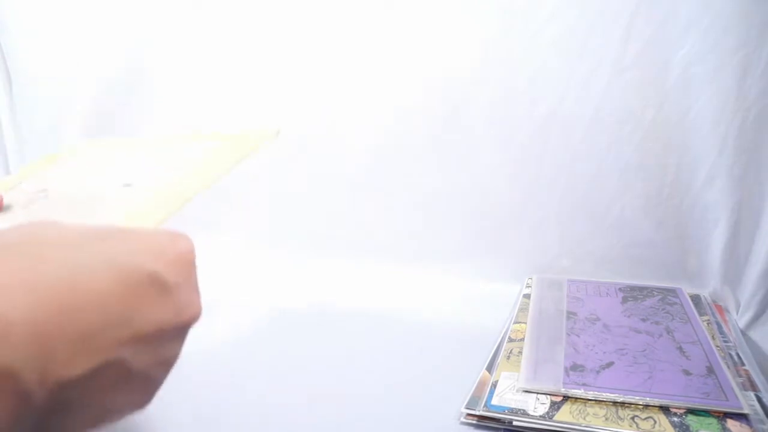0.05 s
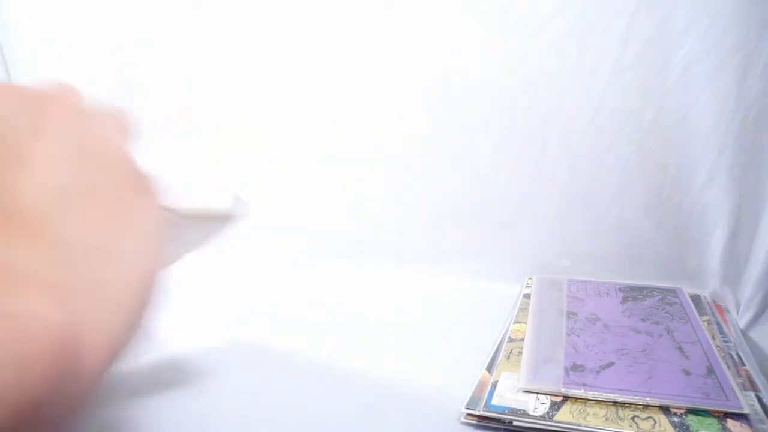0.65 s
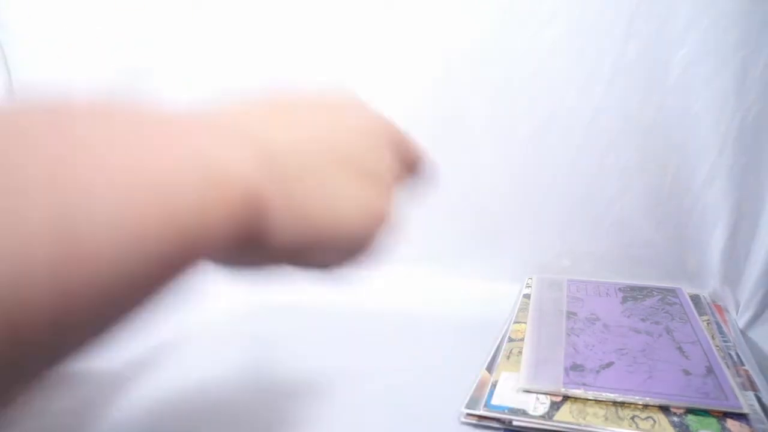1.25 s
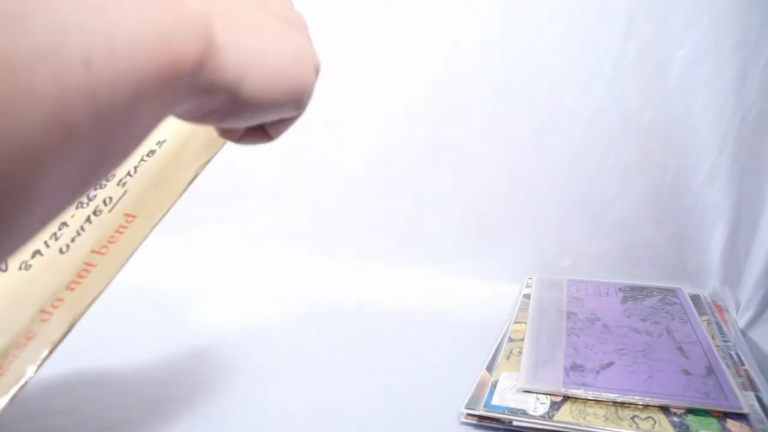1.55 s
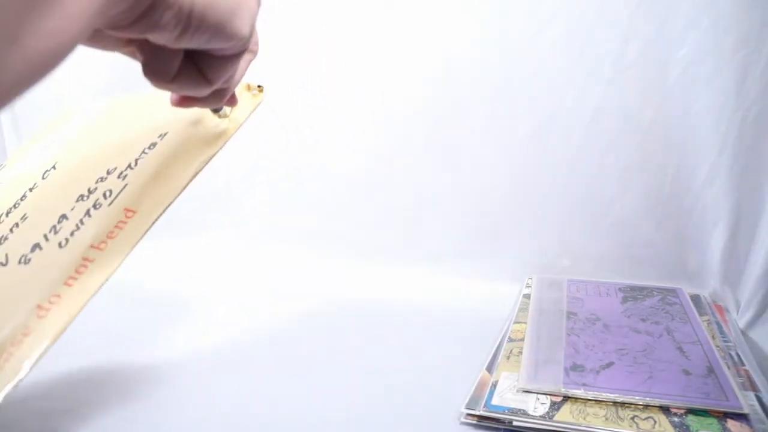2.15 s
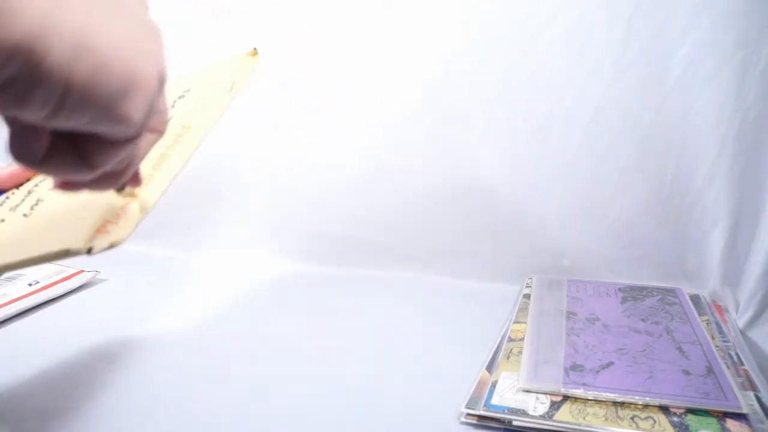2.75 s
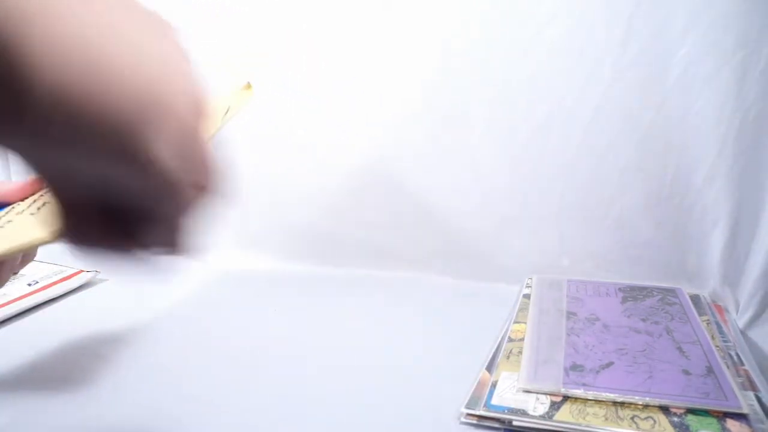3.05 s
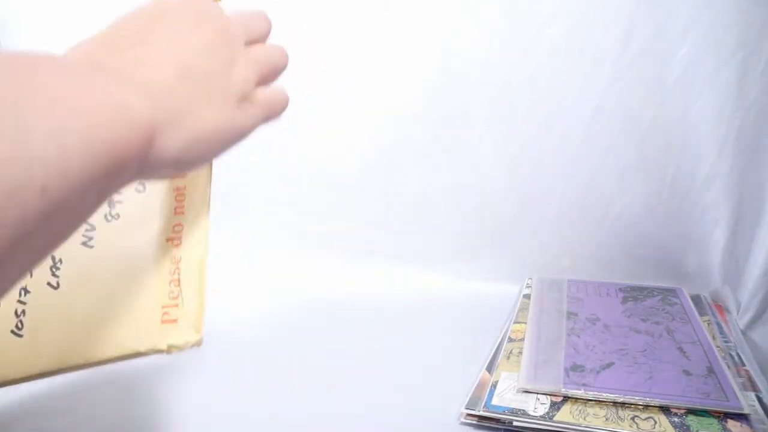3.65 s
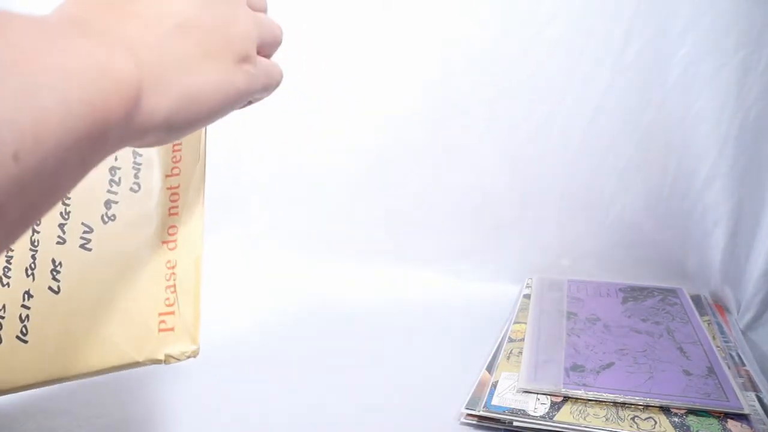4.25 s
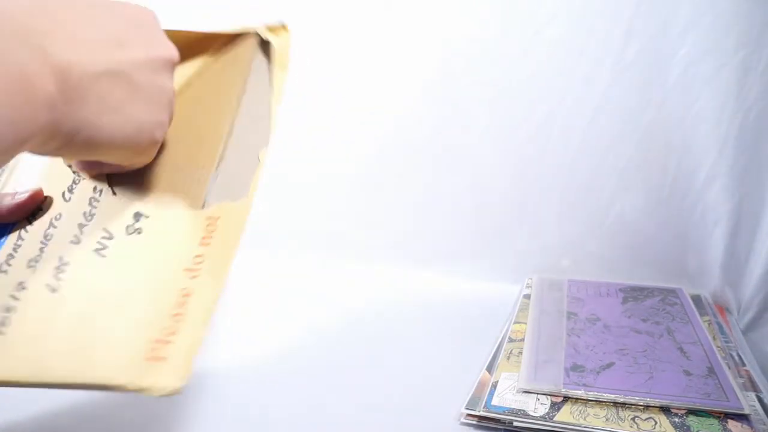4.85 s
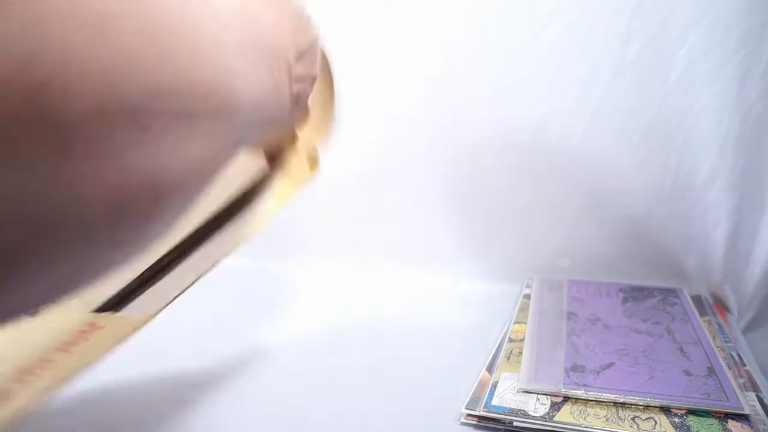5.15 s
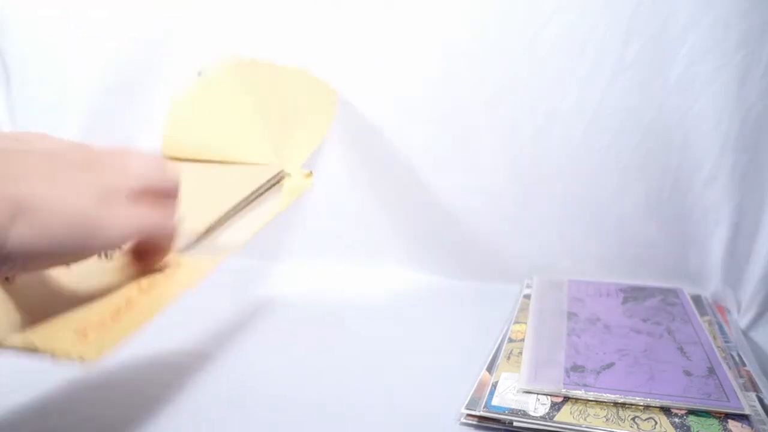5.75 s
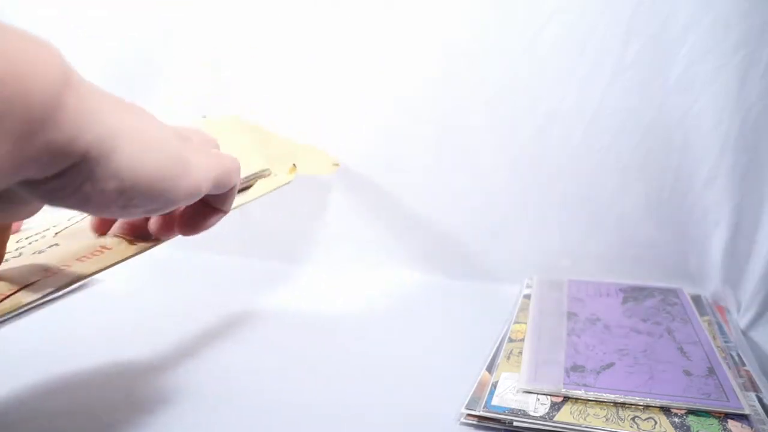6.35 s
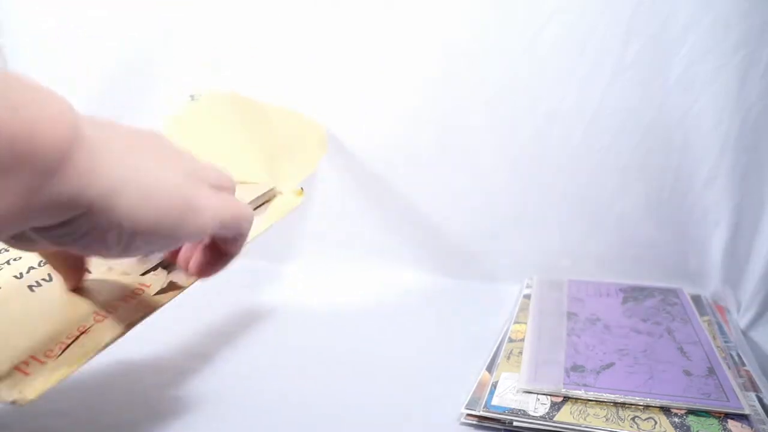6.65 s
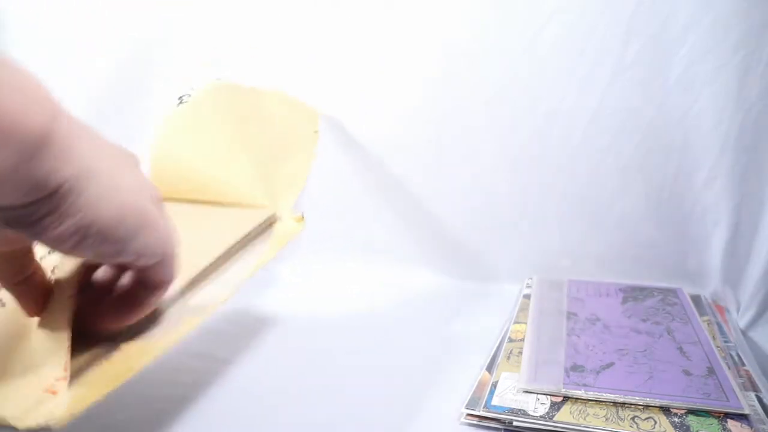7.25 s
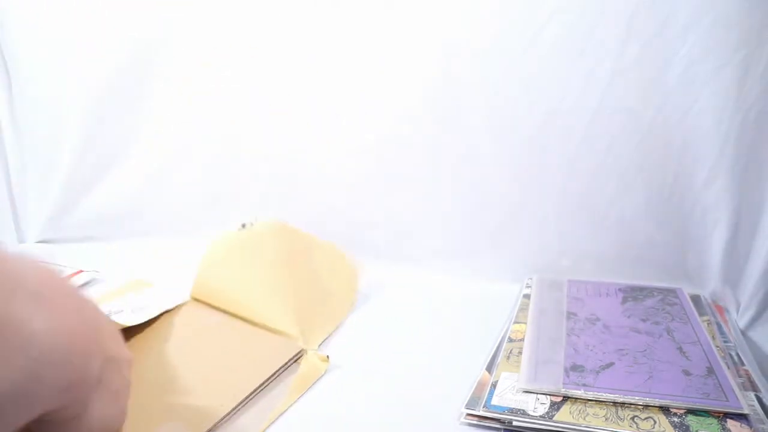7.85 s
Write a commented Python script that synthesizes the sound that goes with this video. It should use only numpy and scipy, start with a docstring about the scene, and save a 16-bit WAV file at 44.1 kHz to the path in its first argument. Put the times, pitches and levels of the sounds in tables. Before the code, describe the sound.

For the first two seconds, fingers brush over a stiff paper envelope in short, soft swishes with a few small ticks, close by in a small room with faint hiss. A crease snaps just before 2 seconds. From 2 to 3 seconds a knife slits the seal in a quick series of louder, raspy pulls. At about 3.3 seconds the knife drops on the table, bouncing with a brief metallic ring. After light rubbing, the flap is torn open from 4.3 to 5.1 seconds in several tugs, full of sharp snaps and soft hollow bumps from the flexing envelope. Quieter finger sliding follows from 5.5 seconds, with a couple of sharp pops around 6.5. From about 6.9 seconds until the end near 8, the paper is squeezed and spread open, crackling densely with loud, crisp pops.

```python
"""First you hear fingers brushing over a stiff paper mailing envelope, close by in a small room.
A knife slits the seal in several pulls, then drops on the table and rings. The flap is torn open,
and fingers slide over the paper and buckle it to reach the contents.
Rubbing, cutting and tearing are streams of tiny clicks from fibres catching and letting go.
Creases and thick fibres give louder pops, and the envelope's flat side, the panel, bumps as it flips."""
import sys
import numpy as np
from scipy import signal
from scipy.fft import rfft, irfft, next_fast_len
from scipy.io import wavfile
from scipy.ndimage import uniform_filter1d

SR = 44100
rng = np.random.default_rng(int(sys.argv[2]) if len(sys.argv) > 2 else 0)


def wrap_up_sound(samples):
    """Save the sound to the file named by the first command line argument, as 16-bit audio."""
    columns = np.atleast_2d(samples).T
    # keep every value between -1 and 1, then stretch to whole-number steps
    tamed = np.clip(columns, -1, 1)
    steps = np.round(tamed * 32767).astype(np.int16)
    wavfile.write(sys.argv[1], SR, steps)


N = 348773
TIME = np.arange(N) / SR
TOP_HZ = 11150  # the treble ends here


def amp(db):
    """Turns decibels into a number to multiply a sound by."""
    return 10 ** (np.asarray(db) / 20)


def unit(x):
    """Scales a signal to an average power of 1."""
    return x / np.sqrt(np.mean(x ** 2) + 1e-20)


def along(points, hz):
    """Reads between the rows of a (frequency, value) table, on an octave scale."""
    f, values = np.transpose(points)
    return np.interp(np.log(hz + 1), np.log(f + 1), values)


def add(track, s, sound):
    """Mixes a sound into the track, starting at s seconds."""
    rest = track[..., round(s * SR):]
    rest[..., :sound.shape[-1]] += sound[..., :rest.shape[-1]]


def lowpass(hz, edge_hz, order):
    """Gain that keeps what lies below the edge; a higher order cuts more steeply."""
    return 1 / np.sqrt(1 + (hz / edge_hz) ** (2 * order))


def highpass(hz, edge_hz, order):
    """Gain that keeps what lies above the edge."""
    return lowpass(edge_hz, hz + 1, order)


def hill(hz, centre_hz, octaves):
    """A smooth hill of height 1 around one frequency."""
    return np.exp(-.5 * (np.log2((hz + 1) / centre_hz) / octaves) ** 2)


def coloured(x, gain, size=2048):
    """Gives x a tone colour: gain(f) says which frequencies are strong and which are weak."""
    hz = np.fft.rfftfreq(size, 1 / SR)
    cepstrum = irfft(np.log(np.maximum(gain(hz), 1e-6)))
    cepstrum[1:size // 2] *= 2  # folded so that the filter never sounds before its input
    cepstrum[size // 2 + 1:] = 0
    response = irfft(np.exp(rfft(cepstrum)))
    return signal.fftconvolve(x, response / np.linalg.norm(response))[:len(x)]


# Tone colour of the background noise: f/Hz, level/dB
BACKGROUND_COLOUR = [(15, -65), (25, -27), (161, -0.5), (237, -2.5), (322, 2), (426, -2), (807, -2.5),
                     (2080, -10), (2240, -7), (3200, -10.5), (4350, -11), (6220, -13.5), (8040, -8),
                     (11200, -21.5), (14600, -51), (22000, -120)]
def room_tone(level_db=-61.5):
    """Faint steady room noise and microphone hiss."""
    noises = rng.standard_normal((2, N))
    mid, side = (coloured(n, lambda f: amp(along(BACKGROUND_COLOUR, f))) for n in noises)
    return amp(level_db) * np.array([mid + 0.89 * side, mid - 0.95 * side])  # left, right


# How long the room echoes: f/Hz, time to fade by 60 dB/s
ECHO_FADE = [(150, 0.15), (400, 0.26), (1000, 0.35), (2800, 0.33), (7300, 0.23), (11000, 0.2)]
# How wide the echo is: f/Hz, level of side (what differs between the ears) against mid/dB
ECHO_WIDTH = [(60, -30), (250, -18), (1000, -12), (4000, -14), (10000, -12)]
def room(x, wet_db, early_db=-1.5, early_fade_s=0.078):
    """Stereo: the direct sound, quick echoes off nearby surfaces, then the room's tail at wet_db."""
    hz, _, spectrum = signal.stft(rng.standard_normal((2, SR // 2)), SR, nperseg=256)
    t = np.linspace(0, .5, spectrum.shape[-1])
    spectrum *= amp(-60 * t / along(ECHO_FADE, hz)[:, None])
    spectrum[1] *= amp(along(ECHO_WIDTH, hz))[:, None]
    tail = signal.istft(spectrum, SR, nperseg=256)[1]
    t = np.arange(tail.shape[1]) / SR
    tail *= 1 - np.exp(-t / 0.0014)
    early = rng.standard_normal(tail.shape) ** 3 * amp(-60 * t / early_fade_s) * (t > .0006)
    early /= np.linalg.norm(early, axis=1, keepdims=True)
    early[1] = coloured(early[1], lambda f: amp(along(ECHO_WIDTH, f)) * lowpass(f, TOP_HZ, order=30))
    early[1] *= amp(-10.5)
    response = amp(wet_db) * tail / np.linalg.norm(tail[0]) + amp(early_db) * early
    response[0, 0] += 1  # the direct sound
    mid, side = signal.fftconvolve(x[None], response / np.linalg.norm(response[0]), axes=1)
    return np.array([mid + side, mid - side])


def moving_room(x, wet_db, size=8192):
    """The envelope keeps moving, so each stretch of sound meets fresh echoes."""
    out = np.zeros((2, N))
    fade = np.sin(np.pi * np.arange(size) / size)
    for start in range(-size // 2, N, size // 2):
        piece = x[max(start, 0):start + size]
        if np.abs(piece).max() > 1e-4:
            faded = piece * fade[max(-start, 0):][:len(piece)]
            add(out, max(start, 0) / SR, room(faded, wet_db))
    return out


# Puffs of air: peak t/s, level/dB, half-length/s
AIR_PUFFS = [(0.673, -62, 0.075), (1.047, -60, 0.076), (6.52, -67.5, 0.1), (7.303, -63, 0.031),
             (7.516, -56, 0.049), (7.698, -62, 0.052)]
def swaying():
    """The whole envelope sways and pushes soft, low puffs of air at the microphone."""
    swell = sum(amp(db) * np.exp(-((TIME - s) / length) ** 2) for s, db, length in AIR_PUFFS)
    low_band = lambda f: lowpass(f, 190, order=3) * highpass(f, 70, order=1)
    mid, side = (coloured(n, low_band) for n in rng.standard_normal((2, N)))
    return swell * np.array([mid + 0.28 * side, mid - 0.17 * side])


# The panel flipping: t/s, level/dB, f/Hz
FLIPS = [(2.717, -29.5, 548), (2.75, -33, 578), (2.775, -33, 307), (4.201, -42.5, 697), (4.408, -37, 320),
         (4.523, -35, 289), (4.56, -29, 714), (4.634, -33, 400), (5.034, -31, 346), (5.056, -30, 292),
         (5.952, -39.5, 589), (7.827, -36, 470)]
def panel_bumps(rise_s=0.0025, fade_s=0.15, blur=.045):
    """Each flip sounds the panel's lowest note, a hollow bump quickly muffled by the hand."""
    out, t = np.zeros((2, N)), np.arange(SR // 4) / SR
    loudness = (1 - np.exp(-t / rise_s)) * amp(-60 * t / fade_s)
    for s, db, hz in FLIPS:
        drift = np.cumsum(blur * rng.standard_normal(len(t)))
        tone = amp(db) * loudness * np.sin(2 * np.pi * hz * t + drift)
        tone = coloured(tone, lambda f: highpass(f, 220, order=4))  # the bump carries no deep rumble below about 220 Hz
        add(out, s, room(tone, wet_db=-15.5, early_db=-8))
    return out


def wobble(per_s):
    """A random curve that glides to a new value per_s times a second."""
    values = rng.standard_normal(int(N * per_s / SR) + 4)
    return np.interp(TIME * per_s, np.arange(len(values)), values)


def fibres(per_s, spread_db, clump_db, smooth):
    """Fibres catch and let go: tiny clicks of uneven size, in clumps, over smooth sliding."""
    hits = rng.random(N) < per_s / SR
    sizes = amp(spread_db * np.minimum(rng.standard_exponential(N), 3.6)) * rng.choice([-1, 1], N)
    clumps = amp(clump_db * np.clip(wobble(170), -2, 2))
    sliding = smooth * rng.standard_normal(N)
    return unit((unit(hits * sizes) + sliding) * clumps)


def bending(x, patchy_db):
    """As the sheet bends, the frequencies it favours keep shifting."""
    spectrum = signal.stft(x, nperseg=512)[2]
    patches = uniform_filter1d(rng.standard_normal(spectrum.shape), size=5, axis=0)  # over frequency
    patches = uniform_filter1d(patches, size=12, axis=1)  # over time
    return unit(signal.istft(spectrum * amp(patchy_db * unit(patches)), nperseg=512)[1][:N])


# Tone colour of the flexing panel: f/Hz, level/dB
PANEL_COLOUR = [(40, -56), (140, -13.5), (215, -7), (315, 3.5), (425, -4.5), (541, 0), (679, -4.5),
                (729, 4.5), (783, -3.5), (1200, -4.5), (1560, -21), (2640, -120)]
def panel_flex(clicks, times, ring_hz, ring_db, octaves=0.48):
    """The panel's low voice, with one ringing pitch that follows how much of it is free to move."""
    voice = coloured(clicks, lambda f: amp(along(PANEL_COLOUR, f)))
    hz, t, spectrum = signal.stft(voice, SR, nperseg=1024)
    gain = amp(ring_db * hill(hz[:, None], np.interp(t, times, ring_hz), octaves))
    gain /= np.sqrt(np.mean(gain[hz < 1200] ** 2, axis=0))
    return unit(signal.istft(spectrum * gain, SR, nperseg=1024)[1][:N])


def strokes(rows, rise_share, release_db_per_s, swell_db):
    """Loudness of hiss, rasp and flex: each stroke fades in, swells or eases, then dies away."""
    power, t = np.zeros((3, N)), np.arange(SR) / SR
    for s, length, db, rasp_db, flex_db in rows:
        rise = 1 - np.exp(-(t / (rise_share * length)) ** 2)  # longer strokes start more gently
        push_db = swell_db * (np.minimum(t / length, 1) - .5)
        release_db = release_db_per_s * np.maximum(t - length, 0)
        loudness = rise * amp(db + push_db - release_db)
        add(power, s, (amp([[0], [rasp_db], [flex_db]]) * loudness) ** 2)
    return np.sqrt(power)


def friction(gains, clicks, colour, flex, patchy_db):
    """The same clicks sound as high hiss at the contact, rasp in the sheet and low flex of the panel."""
    clicks = bending(clicks, patchy_db)
    paper = lambda f: amp(along(colour, f))
    hiss = coloured(clicks, lambda f: paper(f) * highpass(f, 4740, 6) * lowpass(f, TOP_HZ, 30))
    rasp = coloured(clicks, lambda f: paper(f) * highpass(f, 1012, 4) * lowpass(f, 4050, 6))
    return np.sum(gains * [hiss, rasp, flex], axis=0)


# Finger slides: t/s, length/s, hiss level/dB, rasp against hiss/dB, flex against hiss/dB
FINGER_SLIDES = [(0.0, 0.12, -44.5, -4.5, -14.5), (.128, 0.097, -35, -7, -22),
                 (.275, 0.042, -39, -5.5, -18.5), (.33, 0.23, -47, -5.5, -19),
                 (.625, 0.097, -41, -5.5, -13), (.75, 0.11, -56, 1, -14), (.865, 0.099, -42, -5.5, -18.5),
                 (.965, .11, -49.5, -5.5, -2), (1.13, 0.056, -53, -3.5, -15), (1.23, 0.11, -62.5, -6, -4.5),
                 (1.878, 0.061, -44.5, 3, -11), (3.308, 0.052, -53, -7, -24), (3.42, 0.074, -48.5, 3.5, -9),
                 (3.62, 0.043, -47.5, -8, -24), (3.705, 0.068, -56, -2, -13), (3.85, 0.044, -47, -7.5, -16),
                 (4.195, 0.011, -53, -10, 0), (4.255, 0.06, -50.5, -7, -12),
                 (5.458, 0.066, -45.5, -3.5, -13), (5.525, .13, -41.5, -3.5, -10.5),
                 (5.685, 0.17, -48, -8.5, -13.5), (5.775, 0.064, -43.5, -4, -16),
                 (5.86, 0.12, -55.5, 0, -4.5), (5.91, 0.076, -45.5, -6.5, -8.5),
                 (6.068, 0.091, -46, -10.5, -18), (6.138, 0.058, -44.5, -5.5, -32),
                 (6.18, 0.072, -43.5, -1, -2.5), (6.3, 0.13, -49, -6, -16), (6.435, 0.03, -27, -10.5, -15),
                 (6.47, 0.13, -45.5, -10, -7.5), (6.625, 0.056, -36, -8, -16.5),
                 (6.748, 0.05, -36.5, -1, -12)]
# Tone colour of skin on paper: f/Hz, level/dB
SKIN_COLOUR = [(410, -37.5), (700, -11), (1090, -9.5), (1240, -6.5), (1450, -11.5), (2110, -5), (5210, -4),
               (7820, 4.5), (9740, -4), (11200, -12), (12500, -46)]
# The panel's pitch as the grip changes: t/s, f/Hz
GRIP_PITCH = [(.35, 720), (.65, 490), (1.05, 310), (4.2, 694), (5.6, 520), (6, 620), (6.8, 530)]
def rubbing():
    """Skin slides over the paper with a fine, even grain."""
    clicks = fibres(per_s=2500, spread_db=4.5, clump_db=1.5, smooth=1.27)
    flex = panel_flex(clicks, *np.transpose(GRIP_PITCH), ring_db=7.5, octaves=0.57)
    gains = strokes(FINGER_SLIDES, rise_share=0.16, release_db_per_s=206, swell_db=-1.2)
    return moving_room(friction(gains, clicks, SKIN_COLOUR, flex, patchy_db=0.36), wet_db=-13)


# Hand squeezes: t/s, length/s, hiss level/dB, rasp against hiss/dB, flex against hiss/dB
HAND_SQUEEZES = [(6.81, 0.057, -46.5, -5, -6.5), (6.892, 0.013, -33, -9.5, -22),
                 (6.958, 0.049, -31.5, -3, -30), (7.045, 0.067, -27, -4.5, -16.5),
                 (7.16, 0.074, -35.5, -19, -26), (7.236, 0.0091, -29, -1.5, -15),
                 (7.29, 0.13, -36, -6.5, -10.5), (7.52, 0.17, -38, -4, -4.5), (7.70, 0.084, -34, -5, -16),
                 (7.856, 0.021, -26.5, -0.5, -10.5)]
# Tone colour of crackling and popping paper: f/Hz, level/dB
CRACKLE_COLOUR = [(40, -53), (270, -12), (580, -8.5), (1090, -9), (1250, -5.5), (1620, -5), (1910, -3.5),
                  (2600, -4.5), (3970, -4.5), (5930, -8), (7860, -3), (11200, -21), (12500, -49)]
def crumpling():
    """The paper crackles finely as the mouth of the envelope is spread."""
    clicks = fibres(per_s=1700, spread_db=3.5, clump_db=1.5, smooth=0.48)
    flex = panel_flex(clicks, times=[6.9, 7.9], ring_hz=[600, 520], ring_db=2.5)
    gains = strokes(HAND_SQUEEZES, rise_share=0.11, release_db_per_s=203, swell_db=1.0)
    return amp(-2) * moving_room(friction(gains, clicks, CRACKLE_COLOUR, flex, patchy_db=3), wet_db=-3)


def snap(db, length, tilt_db, ring_hz, ring_db, wet_db):
    """Paper gives way in a quick rush of cracks, coloured by the patch that pops."""
    t = np.arange(SR // 16) / SR
    cracks = rng.standard_normal(len(t)) * rng.random(len(t)) ** 4 * np.exp(-t / length)
    cracks[0] += 1.3  # the first break is the sharpest
    slope_db = lambda f: tilt_db * np.log2(np.clip(f, 300, TOP_HZ) / TOP_HZ)
    colour_db = lambda f: along(CRACKLE_COLOUR, f) + slope_db(f) + ring_db * hill(f, ring_hz, 0.27)
    pop = coloured(cracks, lambda f: amp(colour_db(f)) * lowpass(f, TOP_HZ, order=30))
    pop *= amp(db + 1.5) * np.sqrt(length * SR) / np.linalg.norm(pop)
    return room(pop, wet_db, early_db=-3.5)


# Paper buckling or being pierced: t/s, level/dB, length/s, treble tilt/dB per octave, ring f/Hz
CREASE_POPS = [(0.303, -32, 0.0079, 3.5, 3120), (0.339, -41.5, 0.0045, -6.5, 725),
               (0.626, -33.5, 0.0078, -2, 614), (0.834, -48, 0.0027, -2, 2120),
               (1.026, -36, 0.0018, -1, 5500), (1.166, -33.5, 0.0034, 5, 5350),
               (1.575, -28.5, 0.0018, 2.5, 430), (1.68, -47, 0.0024, -9, 736),
               (1.901, -15.5, 0.0082, 7, 2000), (4.199, -41.5, 0.0031, 2, 8400),
               (5.24, -26.5, 0.0019, -3.5, 1360), (6.199, -31, 0.00064, -5.5, 1970),
               (6.352, -28.5, 0.004, 3.5, 8800), (6.447, -16, 0.0059, 3.5, 3180),
               (6.521, -17.5, 0.0014, 4.5, 430), (6.9473, -25, .002, 3, 3770),
               (6.9512, -13.5, 0.0007, 3, 8750), (6.9545, -15, .0009, 0.5, 1600),
               (6.959, -13, .0008, 3.5, 9000), (7.0114, -14.5, 0.0015, 4, 1280),
               (7.017, -22, .0009, 2, 7700), (7.0298, -11.5, 0.0017, 3, 7800),
               (7.035, -26.5, 0.004, -3, 990), (7.0713, -19.5, 0.0013, -3.5, 7500),
               (7.077, -10, 0.0012, 4.5, 1070), (7.251, -13, 0.0037, 2.5, 686),
               (7.296, -21, 0.036, 4.5, 1290), (7.309, -13.5, 0.0011, -0.5, 3930),
               (7.406, -12, 0.0017, 3, 2540), (7.481, -20.5, 0.026, 2, 390),
               (7.524, -15, 0.0056, 0.5, 2380), (7.675, -14, 0.0053, -1.5, 1920),
               (7.729, -13, 0.004, 2.5, 1270), (7.823, -26.5, 0.026, -2.5, 6200),
               (7.855, -20, 0.017, 0, 1080), (7.867, -18, 0.0034, -1.5, 1720),
               (7.894, -10.5, 0.0016, 4.5, 6000)]
# Thick fibres of the seal breaking: t/s, level/dB, length/s, treble tilt/dB per octave, ring f/Hz
SEAL_BREAKS = [(2.587, -17, 0.0025, 3, 6700), (2.975, -17, 0.0033, 2.5, 6700),
               (4.354, -24, 0.001, -2, 1520), (4.413, -19, .002, -2, 2200), (4.441, -15, 0.0015, 0, 7550),
               (4.449, -14.5, 0.0017, 0, 2100), (4.4568, -14, .0016, -1.5, 2410),
               (4.465, -16, 0.003, 1, 8800), (4.497, -26, .003, 3, 8000), (4.5077, -11.5, 0.0025, 4, 1930),
               (4.5146, -18, 0.0016, 2, 2300), (4.523, -14, 0.0047, .5, 2650), (4.551, -17, .005, 4, 7400),
               (4.558, -18, 0.002, -0.5, 2080), (4.603, -21, .002, 4, 4600),
               (4.638, -20.5, 0.0044, 4, 3320), (4.658, -20, 0.0063, 4, 2820),
               (4.676, -12, 0.0015, 1, 1200), (4.723, -14.5, 0.0011, -2, 1130),
               (4.927, -18.5, 0.0036, 4, 1620), (4.955, -19, 0.0025, .5, 1950),
               (4.988, -10.5, 0.0018, 1.5, 6800), (5.008, -10.5, .001, -0.5, 7500),
               (5.048, -25, 0.0011, -4.5, 8000), (5.068, -15, 0.00072, -1, 7500)]
def paper_snaps():
    """Creases pop and bundles of fibres break, each with its own length and colour."""
    out = np.zeros((2, N))
    for s, db, length, tilt_db, hz in CREASE_POPS:
        add(out, s, snap(db, length, tilt_db, hz, ring_db=8, wet_db=-3))
    for s, db, length, tilt_db, hz in SEAL_BREAKS:
        add(out, s, snap(db, length, tilt_db, hz, ring_db=10.5, wet_db=-3.5))
    return out


# The knife's hits: t/s, level/dB, knock's treble edge f/Hz, ring boost/dB, thud boost/dB
KNIFE_HITS = [(3.317, -34.5, 450, -8, 21), (3.3446, -14, 1160, -17, 9), (3.3561, -11, 5570, -20, -11),
              (3.358, -16.5, 5700, -10, -7), (3.376, -19, 5000, -8, -3)]
# Tone colour of a knock on the table: f/Hz, level/dB
KNOCK_COLOUR = [(40, -54), (222, -16), (382, -8), (791, -4.5), (1360, -1), (2230, 9), (3600, 1.5),
                (5400, -3), (6500, -14), (8900, -10), (11000, -38), (14300, -92)]
# The knife's ringing notes: f/Hz, level/dB, time to fade by 60 dB/s
KNIFE_NOTES = [(1170, -15, .55), (1800, -14, .36), (2078, -13, .3), (2579, -16, .28), (2740, -15, .2),
               (2945, -17, .33), (3050, -21.5, 1.25), (3125, -23, 1.2), (3375, -12, .22), (3618, -17, .36),
               (4027, -17, .35)]
# The table top's low notes: f/Hz, level/dB, time to fade by 60 dB/s
TABLE_NOTES = [(144, -39, 0.21), (287, -38, 0.16)]
def knife_drop(knock_fade_s=.016, rattle=.025):
    """The knife lands end first, slaps flat on the table and bounces once."""
    out, t = np.zeros(N), np.arange(SR) / SR
    thud = sum(amp(db - 60 * t / fade_s) * np.sin(2 * np.pi * hz * t) for hz, db, fade_s in TABLE_NOTES)
    for s, db, edge_hz, ring_db, thud_db in KNIFE_HITS:
        blow = rng.standard_normal(len(t)) * amp(-60 * t / knock_fade_s)
        blow[0] += 5
        knock = coloured(blow, lambda f: amp(along(KNOCK_COLOUR, f)) * lowpass(f, edge_hz, order=3))
        knock *= 11 / np.linalg.norm(knock)
        ring = np.zeros(len(t))
        for hz, note_db, fade_s in KNIFE_NOTES:
            drift = np.cumsum(rattle * rng.standard_normal(len(t)))  # the loose blade blurs the ring
            ring += amp(note_db - 60 * t / fade_s) * np.sin(2 * np.pi * hz * t + drift)
        add(out, s, amp(db) * (knock + amp(thud_db) * thud + amp(ring_db - 4) * ring))
    return room(out, wet_db=0.5)[:, :N]


# Pulls of the blade: t/s, length/s, hiss level/dB, rasp against hiss/dB, flex against hiss/dB
BLADE_PULLS = [(2.05, 0.055, -31.5, -5.5, -31), (2.068, 0.049, -24.5, -4, -19.5),
               (2.13, 0.13, -37.5, -3, -12.5), (2.19, 0.12, -24.5, -5.5, -19.5),
               (2.33, 0.048, -31, -8.5, -19), (2.385, 0.064, -26, -5.5, -16.5),
               (2.45, 0.078, -29.5, -4.5, -14.5), (2.53, 0.052, -23, -2.5, -15),
               (2.62, 0.12, -25.5, -3.5, -15), (2.757, 0.02, -20.5, -4.5, -18.5),
               (2.8, 0.097, -32, -6, -14), (2.868, 0.1, -24, -9.5, -18.5)]
# Tone colour of the cut: f/Hz, level/dB
BLADE_COLOUR = [(410, -20), (700, -13), (883, -9), (1310, -7.5), (1700, -8.5), (2020, -1.5), (2200, -6.5),
                (2500, -7), (3100, -5.5), (4800, -8), (7640, -0.5), (8680, -3), (11200, -15)]
# The panel's pitch as the blade travels: t/s, f/Hz
SLIT_PITCH = [(2.1, 400), (2.3, 644), (2.45, 736), (2.58, 430), (2.73, 580), (2.8, 597), (2.95, 535)]
def cutting():
    """The blade chatters through the fibres of the seal."""
    clicks = fibres(per_s=1700, spread_db=1.0, clump_db=1.65, smooth=0.54)
    flex = panel_flex(clicks, *np.transpose(SLIT_PITCH), ring_db=4.5, octaves=0.35)
    gains = strokes(BLADE_PULLS, rise_share=0.21, release_db_per_s=343, swell_db=1.0)
    return amp(-1.3) * moving_room(friction(gains, clicks, BLADE_COLOUR, flex, patchy_db=0.5), wet_db=-5)


# Tugs on the flap: t/s, length/s, hiss level/dB, rasp against hiss/dB, flex against hiss/dB
FLAP_TUGS = [(4.326, 0.029, -35, 0, -10.5), (4.36, 0.086, -35.5, -3, -11), (4.44, 0.13, -27.5, -6.5, -15.5),
             (4.55, 0.073, -30, -5, -17), (4.625, 0.04, -30, -5, -19), (4.672, 0.047, -25.5, -3, -17),
             (4.74, 0.14, -44, -2, -12), (4.878, 0.099, -28.5, -2.5, -22),
             (4.908, 0.11, -24.5, -9.5, -21.5), (5.015, 0.041, -23.5, -6.5, -14),
             (5.09, 0.11, -42.5, -1, -12), (5.225, 0.054, -53, 6.5, 6)]
# Tone colour of the rip: f/Hz, level/dB
RIP_COLOUR = [(410, -14), (740, -11), (957, -6.5), (2180, -7), (5150, -4.5), (7730, 2.5), (10600, -9),
              (11200, -16)]
# The flap's pitch as it comes free: t/s, f/Hz
FLAP_PITCH = [(4.35, 494), (4.52, 320), (4.62, 736), (4.72, 990), (4.85, 1160), (4.95, 327), (5.06, 291),
              (5.25, 576)]
def tearing():
    """Fine glued fibres part in clumps, and the flap drums as it comes free."""
    clicks = fibres(per_s=1800, spread_db=3.0, clump_db=0.5, smooth=0.55)
    flex = panel_flex(clicks, *np.transpose(FLAP_PITCH), ring_db=9)
    gains = strokes(FLAP_TUGS, rise_share=0.2, release_db_per_s=324, swell_db=3.5)
    return moving_room(friction(gains, clicks, RIP_COLOUR, flex, patchy_db=3), wet_db=-3)


def scene():
    """Mixes everything, with the envelope held a little left of centre."""
    paper = rubbing() + cutting() + tearing() + crumpling() + paper_snaps() + panel_bumps() + swaying()
    return paper * amp([[.25], [-.25]]) + knife_drop() + room_tone()


def record(dry, ceiling=.8):
    """Rounds off the tallest peaks and cuts the treble above TOP_HZ."""
    rounded = dry / (1 + np.abs(dry / ceiling) ** 8) ** (1 / 8)
    size = next_fast_len(N + SR // 4)
    treble_cut = lowpass(np.fft.rfftfreq(size, 1 / SR), TOP_HZ, order=130)
    return irfft(rfft(rounded, size) * treble_cut, size)[:, :N]


dry = scene()
out = record(dry)
wrap_up_sound(out)
```